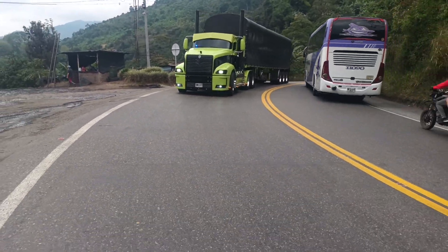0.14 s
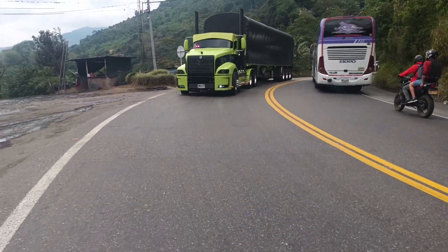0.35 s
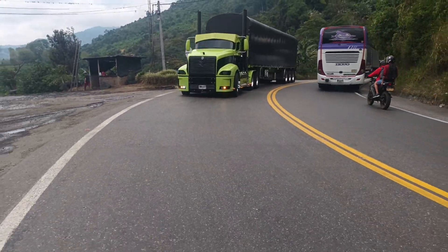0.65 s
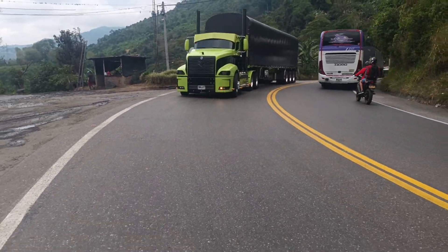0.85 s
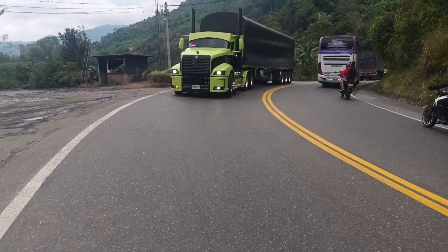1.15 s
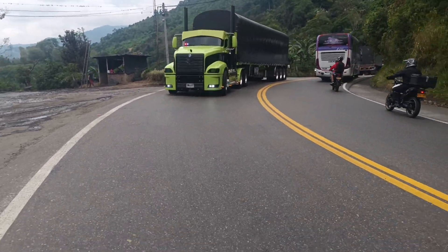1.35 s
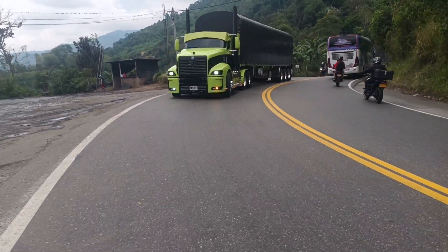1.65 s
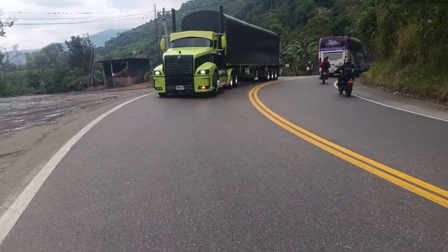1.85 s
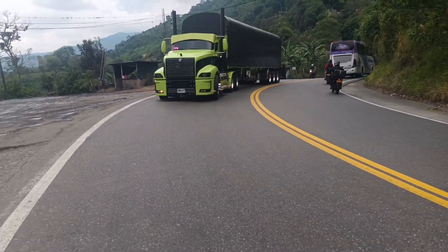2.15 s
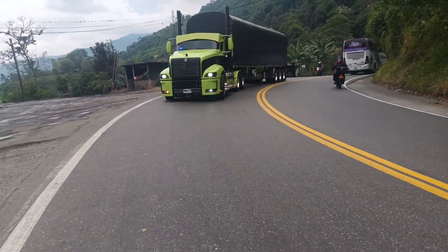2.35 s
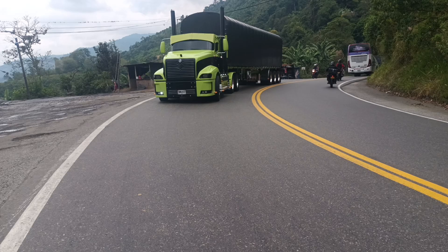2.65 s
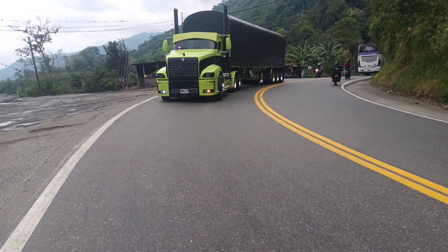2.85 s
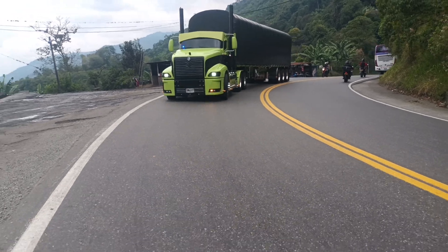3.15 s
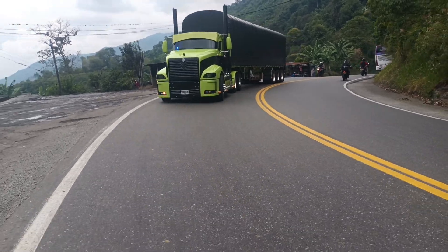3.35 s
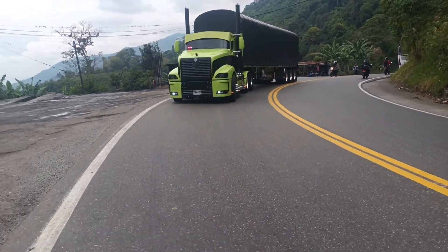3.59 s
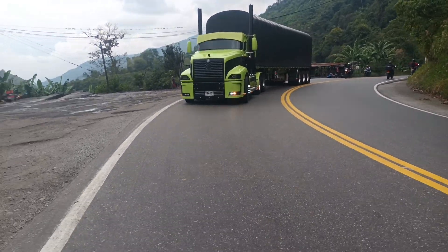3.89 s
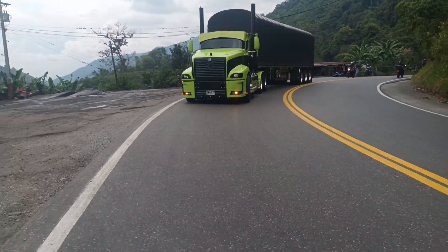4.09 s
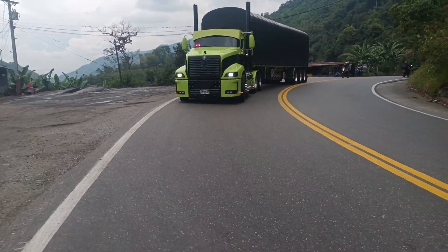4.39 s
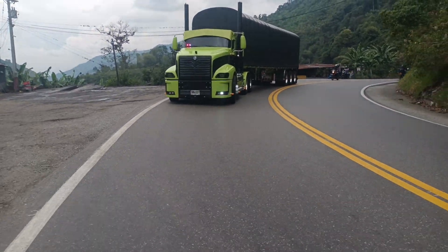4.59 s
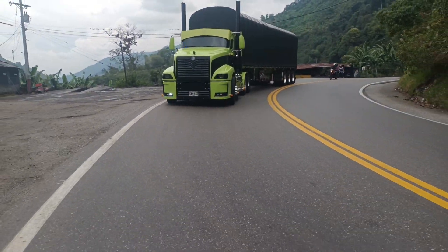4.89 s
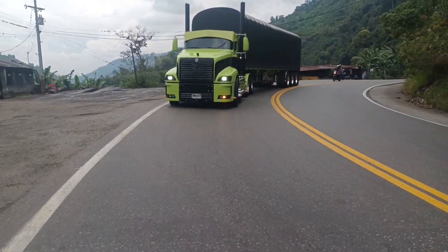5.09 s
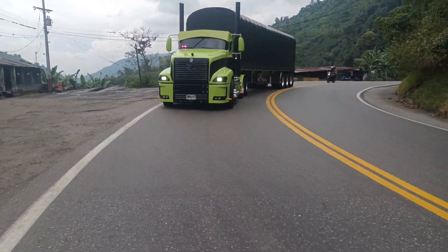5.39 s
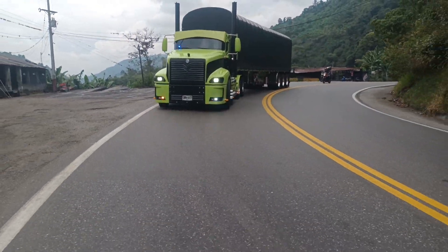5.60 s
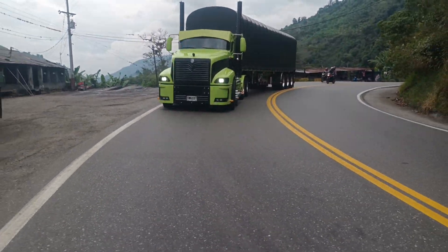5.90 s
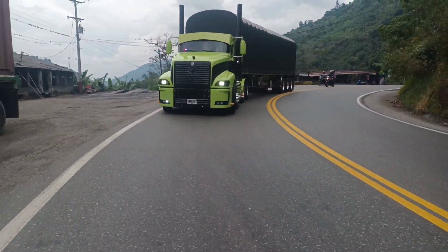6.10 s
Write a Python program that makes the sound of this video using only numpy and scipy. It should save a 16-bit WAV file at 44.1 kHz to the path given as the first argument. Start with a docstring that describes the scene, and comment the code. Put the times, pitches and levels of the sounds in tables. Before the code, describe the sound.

Close roadside stereo pickup of a labouring truck: loud low drone, knocking engine block, thin high turbo whistle and steady tyre hiss with tiny squeaks. Early on, a bus and two motorbikes recede to the right. The truck's pitch climbs until about five seconds, then abruptly loses its weight with a short hiss; a wavering gear whine follows as revs fall, before uneven low thumps and a slight pick-up.

```python
"""Diesel lorry on a mountain road

A six-cylinder lorry labours uphill and nears, revving up until it changes gear.  Tones on its firing rate
drone through resonant stacks, pulsed noise rings the block, and the gears whine during the change.
The turbo whistles as frequency-modulated sines and runs down amid bursts of coloured noise, a hiss of air.
A bus and two motorbikes, heard as pulsed noise, draw away in the other lane; narrow-band squeaks sound
faintly over the tyre noise.
"""
import sys
import numpy as np
from scipy import signal
from scipy.fft import rfft, irfft
from scipy.io import wavfile

SR = 44100
rng = np.random.default_rng(int(sys.argv[2]) if len(sys.argv) > 2 else 0)


def generate_wav(sig):
    """Save sig (samples, or channels by samples) to the path in sys.argv[1] as 16-bit PCM at SR."""
    pcm = np.round(np.clip(np.atleast_2d(sig).T, -1, 1) * 32767).astype(np.int16)
    wavfile.write(sys.argv[1], SR, pcm)


N = 275184
T = np.arange(N) / SR
FREQ = np.maximum(np.arange(N // 2 + 1) * SR / N, 1)  # Hz, floored to keep divisions and logarithms finite

# Rolling tyres and wooded hillside: (frequency [Hz], relative level [dB])
ROAD_SPECTRUM = [(20, -9), (40, -2), (90, 16.5), (300, 3), (1000, -10.5), (2500, 2), (3400, -7.5),
                 (5000, -19), (8000, -24.5), (10000, -26), (12500, -26), (15500, -43)]
# Thin squeaks: (time [s], frequency [Hz], level [dB], half length [s])
SQUEAKS = [(0.519, 8100, -49, .02), (2.24, 8130, -53, 0.017), (2.659, 8200, -49, 0.011),
           (2.707, 8200, -47, 0.015), (3.018, 8200, -55, 0.014), (3.166, 8270, -51, .015),
           (3.28, 8366, -52, 0.013), (5.97, 10250, -48.5, 0.015), (6.22, 8500, -54, 0.016)]

# Bus noise: (frequency [Hz], relative level [dB])
BUS_SPECTRUM = [(60, -17), (150, 4), (230, 0), (330, -0.5), (560, 2), (720, -5.5), (950, -2.5),
                (1150, -6.5), (1400, -5.5), (1900, -14), (2400, -13), (3100, -23.5), (6000, -31.5),
                (15000, -53)]
# Motorbike noise: (frequency [Hz], relative level [dB])
BIKE_SPECTRUM = [(200, -22), (800, -1.5), (1700, -0.5), (2700, 2), (3200, 6.5), (3700, -1), (5000, -12),
                 (7500, -21.5), (10000, -19), (15000, -27.5)]
# Motorbikes opening up as they draw away: (time [s], level [dB], half length [s])
BIKE_SURGES = [(.35, -29, 0.71), (1.148, -32.5, .06), (1.55, -34, 0.075), (2.198, -41, .25)]
# The other lane lies to the right: (frequency [Hz], right minus left [dB])
LANE_SIDE = [(1300, 0), (2000, 3.5), (2800, 11), (3250, 4), (3900, 5), (5500, -1.5)]
BUS_FIRING_HZ, BIKE_FIRING_HZ = 164.1, 56
BUS_DB, BUS_FADE_DB_PER_S = -22, 0.66  # level at the start; loss as it draws away
BEND_S, BEND_FADE_S, BEND_DB = 2.03, 0.41, -7  # the bus slips behind the hillside

# Lorry engine speed in the pull: (time [s], firing rate [Hz])
PULL = [(0.0, 108.8), (0.7, 113.8), (1.55, 117.8), (1.95, 123.8), (2.68, 128.2), (3.43, 134.9),
        (4.11, 142.5), (4.38, 145.2), (4.93, 149.7)]
# The revs fall with the clutch out, then pick up: (time [s], firing rate [Hz])
GEAR_CHANGE = [(4.97, 148.9), (5.07, 134), (5.3, 119.9), (5.8, 95.94), (5.95, 105.4), (6.1, 110.1)]
TOP_RATE_HZ = 150  # firing rate taken as top revs
LIFT_S, LIFT_FADE_S = 4.95, .012  # the driver lifts off the throttle

# Intake rush: (frequency [Hz], relative level [dB])
INTAKE_SPECTRUM = [(2500, -0.5), (4500, -15.5), (5600, -17), (6800, 1), (8000, -5), (9500, -16.5),
                   (13000, -19), (15500, -20)]
# Blow-off valve: (frequency [Hz], relative level [dB])
PUFF_SPECTRUM = [(2500, -6), (5000, -10), (7000, 0), (9000, -3), (12000, -9), (15500, -14)]
# Puffs of air: (time [s], level [dB], decay time [s])
PUFFS = [(1.58, -55, .12), (5.06, -42, 0.083), (5.97, -54, 0.024)]
TURBO_HZ, TURBO_IDLE_HZ, UPPER_RATIO = 7800, 3500, 1.7  # at top revs; with no boost; upper over lower whistle
TURBO_FOLLOW, RUN_DOWN_S = .33, .78  # power of the revs that it follows; decay time off the throttle
WHISTLE_DB, WHISTLE_DB_PER_HZ = -52.5, .035  # at top pitch; growth with the whistle's pitch
# (under load, coasting), both at top pitch; the intake is relative to the block
UPPER_DB, INTAKE_DB = (-65.5, -56.5), (-28, -23.5)
INTAKE_DB_PER_HZ = .003  # intake rush and upper whistle grow with the whistle's pitch

# Engine block as the lorry nears: (time [s], clatter level [dB])
NEARING = [(0, -30), (2.4, -30.3), (3.3, -26.5), (4.4, -23), (5.1, -22), (5.6, -24), (6.24, -23.5)]
# Knock strength of each cylinder in firing order: (relative level [dB])
CYLINDERS = [2, -1.5, 1, -3, 0, -1.5]
# Resonances of block and bonnet: (frequency [Hz], width [Hz], relative level [dB])
BLOCK_RESONANCES = [(261, 160, -3), (382, 52, 0.5), (575.4, 40, 5), (717, 57, 3.5), (817, 118, -1),
                    (1391, 240, 6), (1992, 390, -6.5), (2235, 418, 3.5), (2413, 160, -2), (2658, 73, -9.5)]
# Dry rattle between those resonances: (frequency [Hz], relative level [dB])
RATTLE_SPECTRUM = [(100, -44), (250, -8), (800, 4.5), (1050, -19), (1700, -25), (2600, -4.5), (3200, -27),
                   (4200, -25.5), (5500, -28), (7500, -27), (10000, -36.5), (15000, -37)]
HARD_KNOCK_DB, HARD_KNOCK_DB_PER_HZ = -7.5, 0.13  # against the block at top revs; growth with firing rate
WHINE_S, WHINE_LENGTH_S, WHINE_DB = 5.68, 0.36, -30  # gearbox whine: middle, half length, level
WHINE_HZ, WHINE_SAG_HZ_PER_S = 1340, 240  # pitch at its middle; fall of pitch

# Overtones climbing through a stack resonance: (multiple of the firing rate [1], relative level [dB])
OVERTONES = [(8 / 3, -1.5), (17 / 6, -3), (3, -13), (19 / 6, -1)]
OVERTONE_DB, RASP_DB = (-27.7, -40), (-40.5, -35)  # (under load, coasting)

# Resonances of the hot exhaust stacks: (frequency [Hz], width [Hz], gain [dB])
STACK_RESONANCES = [(58, 11, -5.5), (72, 15.4, -1.7), (126, 36.9, 0.24), (164.7, 11, -7.5),
                    (201, 25, -11.5), (291, 63, -12)]
# Main tones: (multiple of the firing rate [1], relative level under load [dB], the same coasting [dB])
FIRING_TONES = [(1 / 2, -7, -22), (1, 0, -10.5)]
# Tones of unequal cylinders: (multiple of the firing rate [1], relative level under load [dB],
# the same coasting [dB])
UNEVEN_TONES = [(2 / 3, -15, -28.5), (5 / 6, -11.5, -18), (7 / 6, -18, -26), (4 / 3, -23, -23),
                (3 / 2, -7, -13.5), (5 / 3, -17, -18), (11 / 6, -15, -18), (2, -14.5, -16)]
# Lumpy firings while the engine hunts for the next gear: (time [s], peak level [dB])
LUMPS = [(5.633, -23), (5.695, -21), (5.838, -19), (5.955, -13.5), (6.033, -18), (6.068, -15), (6.176, -13)]
EXHAUST_DB, THUMP_DB = -14, -31.5  # tones, and the thumps of uneven firings
COOLING = 0.095  # share by which stack resonances drop when the gas cools off the throttle

# Colour of the left microphone: (frequency [Hz], gain [dB])
LEFT_PORT = [(2200, 0), (2600, 1), (2880, 0), (3200, -9), (3700, -4.5), (4500, -2)]
# Colour of the right microphone: (frequency [Hz], gain [dB])
RIGHT_PORT = [(60, -10), (600, -9.5), (1100, -9.5), (1400, -7.5), (1700, -8), (2550, -8.5), (3050, -10),
              (3500, -7.5), (4400, -5), (5500, -4), (7700, 3.5), (10000, -2.5), (15000, .3)]
LORRY_LAG_S, LANE_LAG_S = .000965, .00111  # delay of direct sound at the left microphone
TOP_HZ = 15550  # upper band limit


def undb(db):
    """Amplitude gain is ten to the power of the level in decibels over twenty."""
    return 10 ** (np.asarray(db) / 20)


def unit(x):
    """Normalization: dividing by the root mean square gives a signal of rms 1."""
    return x / np.sqrt(np.mean(x ** 2))


def curves(table):
    """Linear interpolation: each column after the first becomes a function of time."""
    s, *columns = np.transpose(table)
    return [np.interp(T, s, c) for c in columns]


def colour(x, points):
    """Spectral shaping: levels joined over log frequency weight the spectrum without phase shift."""
    hz, db = np.transpose(points)
    gain = undb(np.interp(np.log(FREQ), np.log(hz), db))
    return irfft(rfft(x) * gain, N)


def ring(x, hz, width):
    """Resonance: two identical band-passes in cascade give steep flanks."""
    return irfft(rfft(x) / (1 + 1j * (FREQ - hz ** 2 / FREQ) / width) ** 2, N)


def noise():
    """Incoherence: independent noises for the direct path and the scatter at each microphone."""
    return rng.standard_normal((3, N))


def walk(rate):
    """Slow fluctuation: noise low-passed at the given rate [Hz], of rms 1."""
    return unit(irfft(rfft(rng.standard_normal(N)) / (1 + (FREQ / rate) ** 4), N))


def after(s, fade_s):
    """Exponential relaxation: 1 until s, then decay."""
    return np.exp(-np.maximum(T - s, 0) / fade_s)


def by_throttle(loaded, coasting):
    """Load dependence: a value relaxes from loaded to coasting once the driver lifts off."""
    return coasting + (loaded - coasting) * after(LIFT_S, LIFT_FADE_S)


def ports(paths, lag_s, scatter_hz):
    """Two-point reception: direct sound arrives right first; scatter takes over above scatter_hz."""
    direct, scattered = rfft(paths[0]), rfft(paths[1:])
    share = FREQ / (FREQ + scatter_hz * scatter_hz / FREQ)  # scattered share of the power
    delay = np.exp(-2j * np.pi * FREQ * np.array([[lag_s], [0]]))
    return irfft(direct * delay * np.sqrt(1 - share) + scattered * np.sqrt(share), N)


def knocks(firings, pattern_db, scatter_db, decay, between):
    """Impulsive excitation: each firing sets off a decay of its own strength over a steady floor."""
    k = firings.astype(int)
    chance = rng.uniform(-1.7, 1.7, 4096)  # spread about 1
    size_db = np.array(pattern_db)[k % len(pattern_db)] + scatter_db * chance[k]
    pulse = np.exp(-(firings % 1) / decay)  # decay in firing periods
    return unit(between + undb(size_db) * pulse)


def repeating(firings, share):
    """Periodicity in noise: a share of its power recurs alike in every round of the cylinders."""
    rounds = (firings / len(CYLINDERS)).astype(int)
    since_start = np.arange(N) - np.searchsorted(rounds, rounds)  # samples into the round
    return np.sqrt(share) * noise()[:, since_start] + np.sqrt(1 - share) * noise()


def road():
    """Friction noise: rolling tyres give fluctuating broadband noise, squeaks brief narrow bands."""
    tyres = unit(colour(noise(), ROAD_SPECTRUM)) * undb(-31.0 + walk(9.4))
    rub = noise()
    squeaks = 0
    for s, hz, db, length in SQUEAKS:
        swell = np.exp(-((T - s) / length) ** 2)
        squeaks = squeaks + unit(ring(rub, hz, width=720)) * undb(db) * swell
    return ports(tyres + squeaks, LORRY_LAG_S, scatter_hz=1210)


def bus():
    """Pulsed noise with recession: firings modulate noise, which fades and drops behind the bend."""
    firings = np.cumsum(BUS_FIRING_HZ * (1 + .015 * walk(1))) / SR
    pulses = knocks(firings, [0], scatter_db=3.0, decay=0.56, between=1.0)
    roar = colour(repeating(firings, share=0.31) * pulses, BUS_SPECTRUM)
    level_db = BUS_DB - BUS_FADE_DB_PER_S * T + BEND_DB * (1 - after(BEND_S, BEND_FADE_S))
    return unit(roar) * undb(level_db + .5 * walk(14))


def motorbikes():
    """Amplitude modulation: slow firings make noise putter, and surges add as powers."""
    firings = np.cumsum(BIKE_FIRING_HZ * (1 + 0.077 * walk(0.7))) / SR
    pulses = knocks(firings, [0], scatter_db=4.5, decay=0.43, between=1.35)
    putter = colour(noise() * pulses, BIKE_SPECTRUM)
    power = sum(undb(db) ** 2 / (1 + ((T - s) / length) ** 2) for s, db, length in BIKE_SURGES)
    flutter = undb(.8 * walk(12))
    return unit(putter) * np.sqrt(power) * flutter


def other_lane():
    """Lateralization: arrival and level differences set bus and motorbikes to the right."""
    left, right = ports(bus() + motorbikes(), LANE_LAG_S, scatter_hz=2380)
    left_side = [(hz, -db / 2) for hz, db in LANE_SIDE]
    right_side = [(hz, db / 2) for hz, db in LANE_SIDE]
    return np.array([colour(left, left_side), colour(right, right_side)])


def turbo(rate):
    """Rotor tones and jet noise: whistles follow the revs, then run down; air rushes and puffs."""
    driven_hz = TURBO_HZ * (np.maximum.accumulate(rate) / TOP_RATE_HZ) ** TURBO_FOLLOW
    hz = TURBO_IDLE_HZ + (driven_hz - TURBO_IDLE_HZ) * after(LIFT_S, RUN_DOWN_S)
    waver = np.array([walk(87) for _ in range(3)])
    shaft = 2 * np.pi * np.cumsum(hz * (1 + .004 * waver), axis=1) / SR
    lower = np.sin(shaft) * undb(WHISTLE_DB + WHISTLE_DB_PER_HZ * (hz - TURBO_HZ))
    # turbulence smears the upper whistle into a narrow band of noise
    smear = np.array([walk(130) for _ in range(3)])
    flow = undb(INTAKE_DB_PER_HZ * (hz - TURBO_HZ))
    upper = smear * np.sin(UPPER_RATIO * shaft) * flow * undb(by_throttle(*UPPER_DB))
    intake_db = curves(NEARING)[0] + by_throttle(*INTAKE_DB)
    air = flow * undb(intake_db) * unit(colour(noise(), INTAKE_SPECTRUM))
    jet = unit(colour(noise(), PUFF_SPECTRUM))
    for s, db, fade in PUFFS:
        envelope = np.exp(-np.maximum((T - s) / fade, (s - T) / 0.023))  # rise, then decay
        air = air + jet * undb(db) * envelope
    return ports((lower + upper) * undb(3 * walk(9.1)) + air, LORRY_LAG_S, scatter_hz=5000)


def whine():
    """Gear tone: at a set time the freed gears sing unsteadily at a falling pitch as they slow."""
    hz = (WHINE_HZ - WHINE_SAG_HZ_PER_S * (T - WHINE_S)) * (1 + .02 * walk(39))
    swell = np.exp(-((T - WHINE_S) / WHINE_LENGTH_S) ** 4)
    return swell * undb(WHINE_DB + 4.1 * walk(15)) * np.sin(2 * np.pi * np.cumsum(hz) / SR)


def clatter(rate, firings):
    """Forced resonance: combustion knock rings the block, injectors rattle, and the gears whine."""
    strokes = knocks(firings, CYLINDERS, scatter_db=2.3, decay=.35, between=.65)
    blows = repeating(firings, share=.22) * strokes
    rings = sum(undb(db) * ring(blows, hz, width) for hz, width, db in BLOCK_RESONANCES)
    # at high revs the upper resonances are struck harder
    hard_db = HARD_KNOCK_DB + HARD_KNOCK_DB_PER_HZ * (rate - TOP_RATE_HZ)
    hard = undb(hard_db) * unit(ring(blows, hz=2030, width=280))
    ticks = noise() * knocks(firings, CYLINDERS, scatter_db=3.0, decay=0.36, between=1.0)
    rattle = undb(-8.5) * unit(colour(ticks, RATTLE_SPECTRUM))
    block = unit(rings) + hard + rattle
    level = undb(curves(NEARING)[0] + 0.32 * walk(8.4))
    return ports(block * level + whine(), LORRY_LAG_S, scatter_hz=3440)


def growl(firings):
    """Swept resonance: overtones swell as they pass a stack resonance, and a rasp follows the revs."""
    angle = 2 * np.pi * firings
    tones = sum(undb(db + 2 * walk(5)) * np.sin(m * angle + .5 * walk(8)) for m, db in OVERTONES)
    overtones = ring(tones, hz=405, width=32) * undb(by_throttle(*OVERTONE_DB))
    # random quadrature amplitudes make a narrow band of noise
    rasp = walk(55) * np.sin(6.2 * angle) + walk(55) * np.cos(6.2 * angle)
    sound = overtones + rasp * undb(by_throttle(*RASP_DB))
    return ports(np.array([sound] * 3), LORRY_LAG_S, scatter_hz=5070)


def stack_gain(tone_hz):
    """Pipe response: a gliding tone excites each resonance, and cooler gas lowers them all."""
    f = tone_hz / by_throttle(1, 1 - COOLING)
    power = 0
    for hz, width, db in STACK_RESONANCES:
        power = power + (undb(db) / (1 + ((f - hz ** 2 / f) / width) ** 2)) ** 2
    return np.sqrt(power)


def exhaust_tone(rate, firings, multiple, loaded_db, coasting_db, phase):
    """Engine order: a tone locked to the crankshaft is filtered by the stacks."""
    order = np.round(multiple * len(CYLINDERS)) / len(CYLINDERS)  # whole cycles in a round of cylinders
    gain = undb(by_throttle(loaded_db, coasting_db)) * stack_gain(order * rate)
    return gain * np.sin(2 * np.pi * order * firings + phase)


def lumps(hz, swell):
    """Transient response: at set times a low tone swells and dies within a few cycles."""
    out = 0
    for s, db in LUMPS:
        age = np.maximum(T - s, 0)
        envelope = (age / swell * np.exp(1 - age / swell)) ** 2
        out = out + undb(db) * np.sin(2 * np.pi * hz * age) * envelope
    return out


def exhaust(rate, firings):
    """Periodic excitation: firings drone, unequal cylinders add tones, uneven ones thump the pipe."""
    tones = 0
    for row in FIRING_TONES:
        tones = tones + exhaust_tone(rate, firings, *row, phase=0) * undb(0.66 * walk(2.7))
    for row in UNEVEN_TONES:
        phase = rng.uniform(0, 2 * np.pi) + 0.53 * walk(3.8)
        tones = tones + exhaust_tone(rate, firings, *row, phase=phase) * undb(2.7 * walk(1.5))
    k = firings.astype(int)
    kicks = np.diff(k, prepend=0) * rng.standard_normal(4096)[k]  # one random impulse a firing
    thumps = unit(ring(kicks, hz=126.3, width=64) + undb(-17.0) * ring(kicks, hz=180, width=200))
    drone = np.sqrt(2) * undb(EXHAUST_DB) * tones
    sound = drone + undb(THUMP_DB) * thumps + lumps(hz=111.6, swell=0.015)
    return ports(np.array([sound] * 3), LORRY_LAG_S, scatter_hz=5000)


def scene():
    """Superposition: one crankshaft drives the lorry's tones, clatter and turbo.

    Whine, puffs and lumps come at set times; road and other traffic are independent.
    """
    rate = curves(list(PULL) + list(GEAR_CHANGE))[0]
    firings = np.cumsum(rate) / SR  # running count of firings
    background = road() + other_lane()
    return background + turbo(rate) + clatter(rate, firings) + growl(firings) + exhaust(rate, firings)


def record(dry):
    """Receiver response: two coloured microphones, the right far weaker below 3 kHz; the top is cut."""
    heard = np.array([colour(dry[0], LEFT_PORT), colour(dry[1], RIGHT_PORT)])
    return signal.sosfilt(signal.ellip(10, .2, 80, TOP_HZ, fs=SR, output="sos"), heard)


dry = scene()
out = record(dry)
generate_wav(out)
```